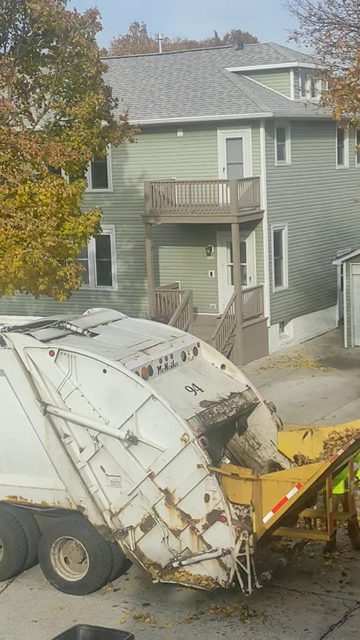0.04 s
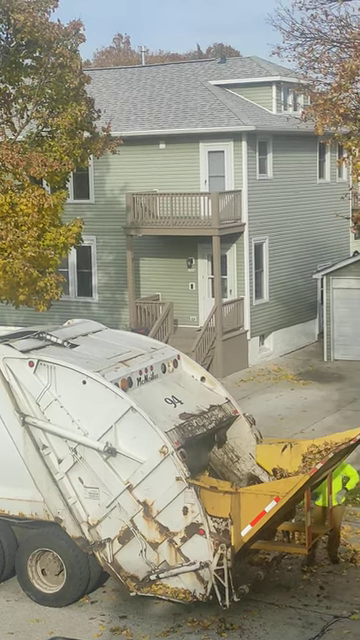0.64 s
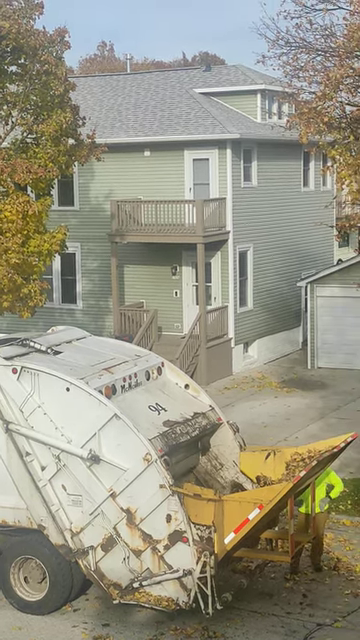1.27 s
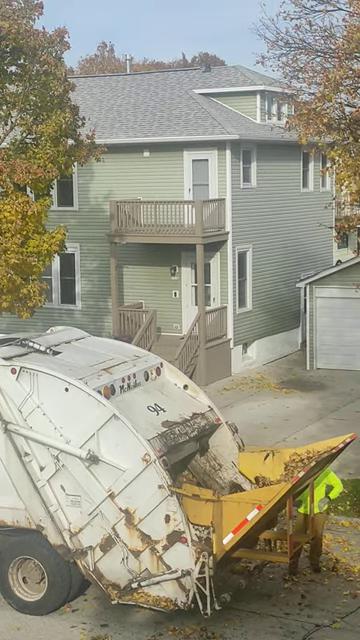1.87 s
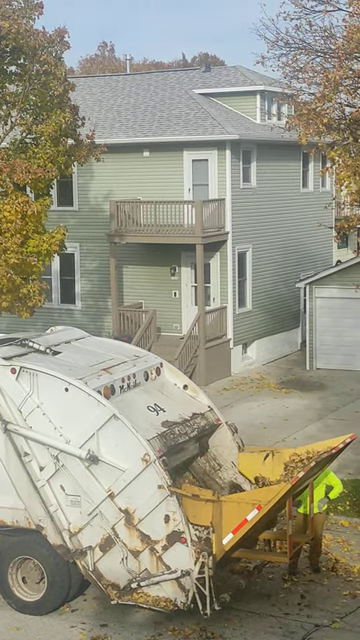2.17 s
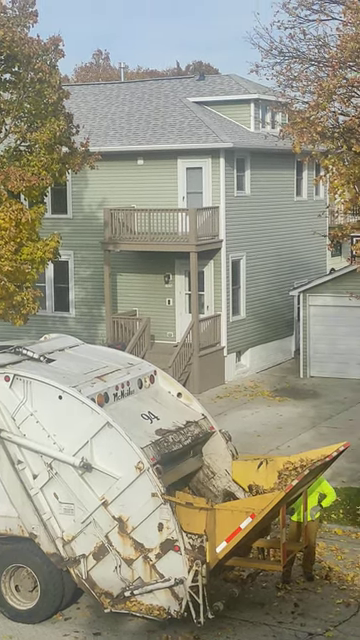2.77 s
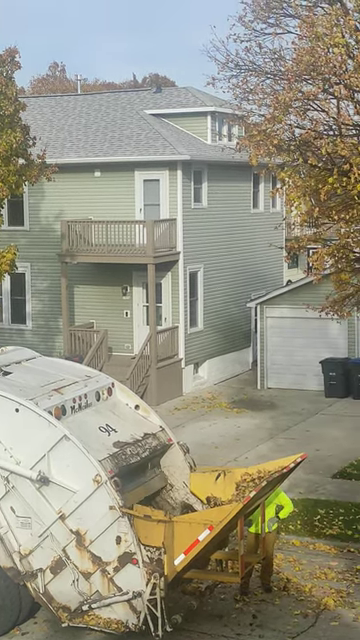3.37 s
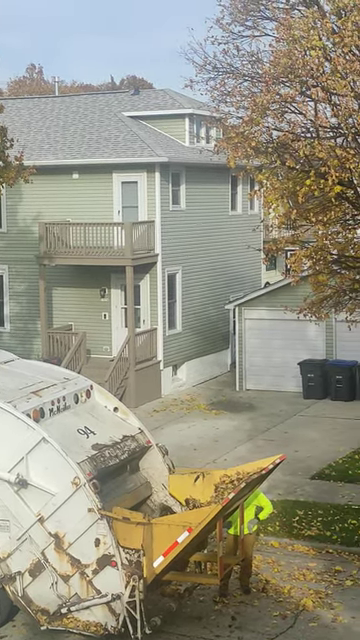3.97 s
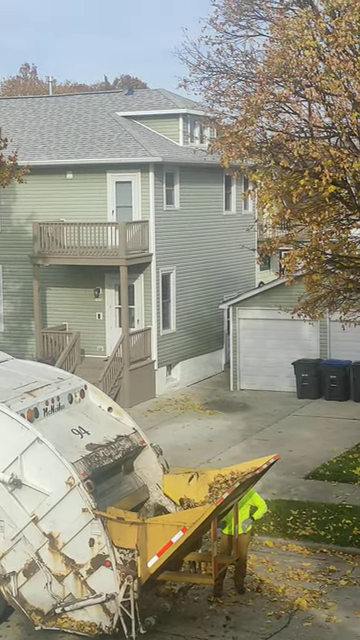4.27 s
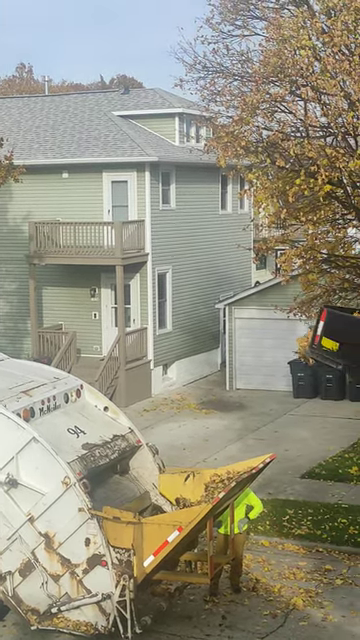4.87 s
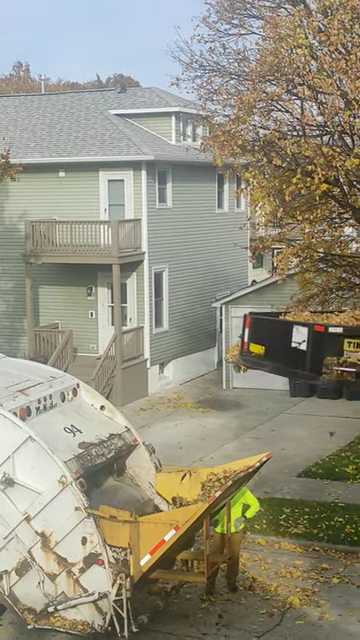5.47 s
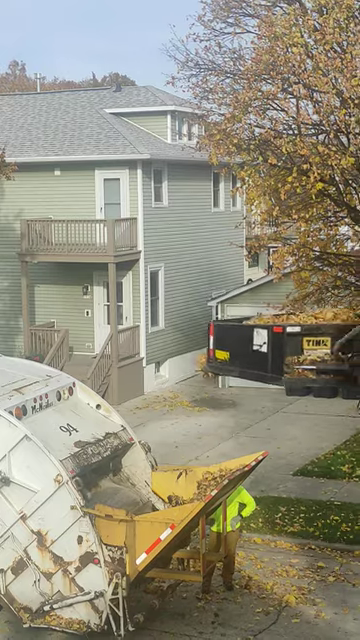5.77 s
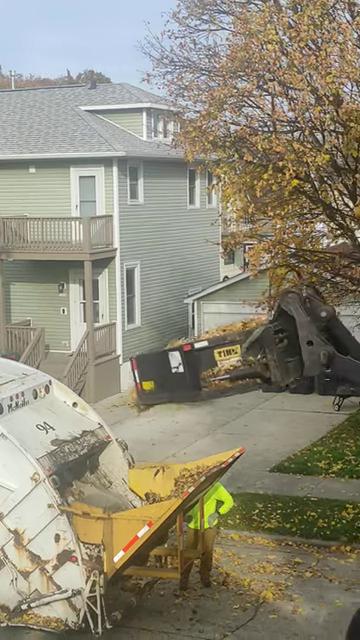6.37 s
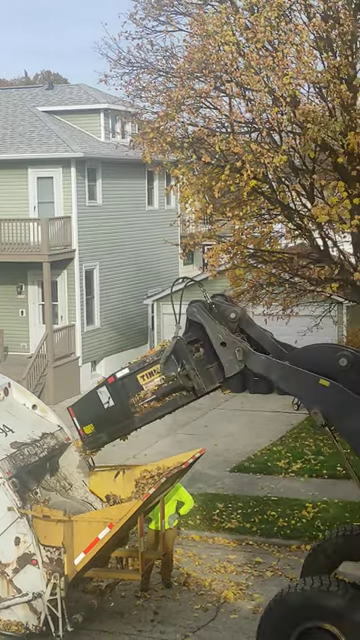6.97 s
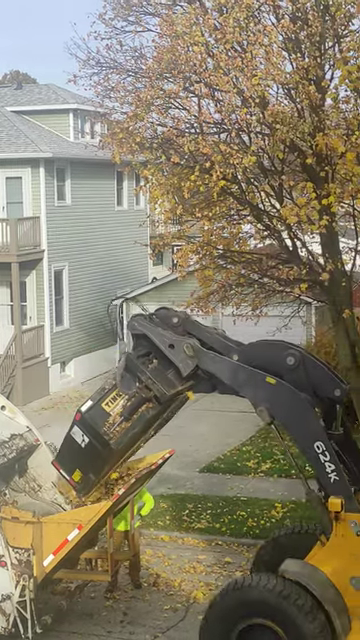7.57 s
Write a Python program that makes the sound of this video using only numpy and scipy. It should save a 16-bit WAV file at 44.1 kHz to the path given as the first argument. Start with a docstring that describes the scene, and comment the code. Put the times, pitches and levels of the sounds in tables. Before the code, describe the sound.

A muffled diesel drone and an even, low hydraulic hum from a refuse truck run from the start, heard inside a parked cab that booms softly. A few small, close creaks sound in the first second or so. At about 2 seconds a dull bump shakes the cab. From 3 seconds a loader's engine sinks in pitch, while the truck's hum builds, holding strongest from about 4.5 to 7 seconds. Faint cloth rustle and a quick run of short creaks come between 3.4 and 4.5 seconds. Around 6 seconds the loader slows again, and light plastic trim ticks follow one another until about 6.7. At 7 seconds the heaviest dull bump lands, with a brief groan that bends upward and settles, plus a rustle and creaks. The hum drops away, and a smaller bump at 7.4 seconds sounds over the continuing engine drone.

```python
"""A muffled engine drone and a steady hydraulic hum, heard inside a parked cab that booms at a few pitches.
The hum is the gear pump of a refuse truck at fast idle; the sinking drone is a wheel loader that drives
up and slows to tip leaves into it. Dull bumps shake the cab's resonances, and the heaviest draws a groan.
Close by, cloth rustles, small stick-slip creaks set a panel ringing and plastic trim ticks."""
import sys
import numpy as np
from scipy import signal
from scipy.fft import rfft, irfft
from scipy.io import wavfile
from scipy.ndimage import uniform_filter1d

SR = 44100
rng = np.random.default_rng(int(sys.argv[2]) if len(sys.argv) > 2 else 0)


def unload_audio(sound):
    """Save the sound as a 16-bit wav file, at the path given as the first command line argument."""
    columns = np.transpose(np.atleast_2d(sound))
    # keep every value between -1 and 1, then stretch to whole-number steps
    steps = np.round(np.clip(columns, -1, 1) * 32767)
    wavfile.write(sys.argv[1], SR, steps.astype(np.int16))


N = 336483

# Levels are fader settings: each layer adds its own trim and pan.
# stereo image of the cab's air: (frequency [Hz], left-right likeness [ratio])
AIR_LIKENESS = [(50, 0), (300, 1.5), (500, -0.18), (1000, 0), (8000, 0)]
# its lean: (frequency [Hz], left over right [dB])
AIR_BALANCE = [(50, 7.5), (300, 6.5), (550, 0.5), (1000, 2), (2000, 2.5), (4500, -2), (8000, -1.5)]
# cab air resonances: (frequency [Hz], width [Hz], gain under the engines [dB], gain when bumped [dB])
CAB_MODES = [(86, 50, -33.5, -2.5), (145, 23, -31.5, -21), (173.3, 9, -9.5, -1.5), (198.6, 17.2, -1.5, 12),
             (222, 35, -8.5, -1), (289.1, 12.2, 0, 7.5), (379.2, 8.1, -13.5, -10.5), (640, 130, -37, -13.5)]
# ride on the cab boom: (time [s], level [dB])
BOOM_RIDE = [(0, -54), (3.3, -60), (6, -57.5), (6.85, -50), (7.28, -58.5), (7.6, -49)]
# ride on the engine noise: (time [s], clatter level [dB], hiss level [dB])
DIN_RIDE = [(0.0, -67.5, -76.5), (1.95, -69, -79.5), (6.82, -68, -78.5), (7.06, -59, -70),
            (7.27, -67, -78.5), (7.63, -69, -79.5)]
# low, middle and high engine noise, each: (frequency [Hz], relative gain [dB])
RUMBLE_EQ = [(22, -25.5), (38, 7.5), (50, 15), (75, 22.5), (100, 9.5), (130, 5), (165, -2.5), (250, 5),
             (340, 15.5), (420, 14), (480, 6), (700, -41.5)]
CLATTER_EQ = [(260, -32), (440, -0.5), (474, -13.5), (513, -4.5), (857, -9.5), (1120, -14), (1370, -14.5),
              (1840, -19), (2140, -21), (2850, -21), (3150, -27.5), (3600, -36.5), (4680, -86.5),
              (7920, -120)]
HISS_EQ = [(2000, -5.5), (3000, -6.5), (3600, 3.5), (4300, 4), (5800, 0), (6900, 0.5), (7600, 1.5),
           (9100, -3), (9800, -28.5), (12500, -29.5)]

# bouts of cloth rustle: (time [s], level [dB], rise [s], decay [s])
RUSTLES = [(0.137, -72, 0.0068, 0.014), (0.62, -87.5, 0.33, 0.42), (2.0, -66.5, 0.019, 0.014),
           (3.75, -79, 0.16, 0.37), (5.62, -87.5, 0.11, 0.2), (7.065, -69.5, 0.079, 0.04),
           (7.245, -73, 0.023, 0.045)]
# a creak's crisp top and hollow body, each: (frequency [Hz], relative gain [dB])
CRISP_EQ = [(2000, -29.5), (3200, -6.5), (5000, -2.5), (6200, -3), (7400, 8), (8700, 2), (9800, -14),
            (12000, -31), (15000, -43.5)]
HOLLOW_EQ = [(400, -15.5), (780, 5.5), (1030, 12), (1350, 2), (1900, 3.5), (2400, 0), (2900, -5),
             (3600, -2.5), (4400, -24.5)]
# creaks and short scrapes: (time [s], level [dB], body offset [dB], left over right [dB], hold [s])
CREAKS = [(.128, -69.5, -5.5, -8, 0.0097), (0.331, -59.5, -4, -1, 0.0041), (0.624, -72.5, 19.5, 5, 0.0045),
          (0.74, -61, 6, -13, 0.0029), (0.9158, -56, -1.5, 3, 0.0028), (1.12, -53, -15, -3, 0.015),
          (1.135, -54.5, 2, -5.5, 0.019), (2.528, -60.5, 2.5, 5, .002), (3.3705, -65, 6.5, 3, 0.0035),
          (3.393, -61, 9.5, 1, 0.012), (3.624, -52.5, 3, 3, 0.011), (3.7245, -62.5, 8.5, -1, 0.0027),
          (3.766, -67.5, 10.5, 2, .009), (3.807, -61.5, 0.5, 9, .003), (3.854, -58.5, 7, 1, .002),
          (3.8885, -64, -10, 1, .001), (3.919, -58, 4, -1, 0.0027), (3.971, -61, 7.5, -4, .004),
          (4.045, -59, 8, 0, .002), (4.0868, -47.5, 1.5, 3, 0.003), (4.158, -56, 4, 1, 0.0076),
          (4.1975, -56.5, 5, -3, .001), (4.2315, -54, -7.5, -3, 0.0023), (4.25, -55.5, 6, -1, .002),
          (4.3035, -59.5, 1, 0, 0.0011), (4.4435, -61.5, 9.5, -2.5, 0.0026), (4.526, -57, 5.5, 0, 0.0022),
          (5.62, -68, 6, 0, 0.015), (5.712, -62.5, 7.5, 5, 0.002), (6.8485, -58.5, 0, -1, .002),
          (6.938, -57.5, -0.5, -2, 0.0031), (7.216, -60, -19, -4, 0.034), (7.2635, -47.5, -25.5, 0, 0.0047)]
# the panel they set ringing: (frequency [Hz], width [Hz], level over the creaks' body [dB])
PANEL_MODES = [(1090, 60, -16.5), (1660, 73, -15.5), (2260, 390, -29.5), (2880, 180, -15)]
# faint rings left by a few creaks: (time [s], half length [s], pitch [Hz], level [dB])
SQUEAKS = [(1.136, 0.0091, 1800, -67), (1.164, 0.13, 7530, -86), (2, 0.014, 6600, -77),
           (3.634, 0.021, 1040, -67), (6.938, 0.007, 1890, -63)]
# plastic trim ticks: (time [s], crack [dB], lower ring [dB], upper ring [dB], left over right [dB])
TICKS = [(.277, -71.5, -75, -79, -2), (1.518, -62.5, -68, -69, -2), (3.188, -78, -75, -71.5, -7),
         (5.258, -62, -69, -70, 0), (5.911, -62.5, -78, -72, 1), (6.079, -80, -84, -71.5, -1),
         (6.14, -74, -82, -84, -5), (6.2258, -66, -77, -71, -1), (6.280, -68.5, -69, -76, -8),
         (6.343, -74, -74, -66, -6), (6.459, -67, -80, -84, 3), (6.5, -66, -78, -67.5, -5),
         (6.547, -71, -78, -72, -4), (6.692, -75, -79, -73, 1), (7.116, -65, -69, -62, -12)]
# the trim's two rings: (frequency [Hz], width [Hz])
TRIM_MODES = [(5250, 980), (7400, 490)]
# dull bumps: (time [s], level [dB], rise [s], decay [s])
BUMPS = [(2.02, -42, 0.069, 0.044), (2.098, -45.5, 0.029, 0.11), (7.045, -37.5, 0.012, 0.069),
         (7.12, -44.5, 0.013, 0.088), (7.41, -44.5, 0.029, 0.028)]
# the cab's groan under the heaviest bump: (time [s], pitch [Hz], level [dB])
GROAN = [(6.96, 268, -89), (7.025, 260.6, -42.5), (7.058, 287, -34), (7.08, 300, -36), (7.11, 298, -55),
         (7.148, 293.4, -40), (7.218, 281.7, -41), (7.27, 288, -96)]

# loader engine, slowing in two steps: (time [s], firing rate [Hz])
FIRING_RATE = [(0, 66.5), (.3, 69.8), (1.3, 73.7), (2.9, 73.4), (3.8, 64.6), (4.5, 63.4), (5.8, 63),
               (6.65, 53.2), (7.2, 51.3), (7.63, 52.5)]
# ride on its exhaust's firing tone: (time [s], level [dB])
EXHAUST_RIDE = [(0, -49), (.13, -40), (.5, -40), (1.45, -50), (3.12, -52.5), (3.35, -45), (3.8, -54),
                (6, -53), (6.8, -48), (7.6, -44)]
# brief dips in that tone as the loader moves: (time [s], half length [s], depth [dB])
EXHAUST_DIPS = [(3.592, 0.074, 14), (5.014, 0.21, 17), (6.103, 0.068, 31)]
# overtones of the firing tone: (pitch [multiple of the firing rate])
LOADER_OVERTONES = [3, 4, 6, 8, 9, 12, 14]
# ride on those overtones: (time [s], gain [dB])
LOADER_EFFORT = [(0, -3.5), (2.9, -0.5), (3.9, -3), (4.3, 1.5), (4.7, -2), (5.15, 6.5), (5.5, 0),
                 (5.9, 3.5), (6.2, -1)]
# their pan at 300, 380 and 570 Hz: (left over right [dB])
OVERTONE_PAN = [5.5, 13.5, 8.5]
# resonances that lift an overtone gliding through: (frequency [Hz], half width [Hz], gain [dB])
DRONE_PEAKS = [(189.3, 2.2, 12), (291, 17, 25), (360, 13.4, 17), (381.8, 15.3, 23.5), (449, 13, 17.5),
               (563, 8, 10), (634, 27, 7), (747, 17, 11.5), (884, 4.3, 10.5)]
# tones from uneven cylinders: (pitch [multiple of the six-firing cycle rate])
UNEVEN_ORDERS = [3, 4, 12, 14, 16]
# their mix: (level at speed [dB], level when slowed [dB])
UNEVEN_LEVELS = [(-66, -79.5), (-71, -67), (-73, -76), (-68.5, -87), (-85.5, -78.5)]
# loader hydraulics: (time [s], pitch [Hz], level [dB])
LOADER_PUMP = [(0, 258.6, -64), (2.2, 262, -61.5), (2.95, 258.3, -64), (3.35, 234, -56),
               (4.4, 229.2, -57.5), (5.5, 221.9, -72.5), (7.63, 197, -65)]

# truck crankshaft: (time [s], speed [turns/s])
CRANK_SPEED = [(0, 21.7), (.3, 21.57), (.9, 21.27), (1.5, 21.12), (2.6, 21.0), (3.5, 20.91), (4.5, 20.85),
               (7.63, 20.84)]
# truck engine tones: (pitch [multiple of crankshaft speed])
TRUCK_ORDERS = [3, 6, 8, 9, 12, 14, 15, 18, 25, 28, 30, 33, 50]
# their mix: (level [dB])
TRUCK_LEVELS = [-72.5, -76.5, -71, -71.5, -79, -70, -74, -78.5, -86.5, -85.5, -85, -85.5, -84.5]
# timing gear mesh, from the first harmonic up: (gain [dB])
GEAR_HARMONICS = [5.5, -1, 0, -6]
# ride on the pump hum, building under load and dropping near the end: (time [s], level [dB])
PUMP_RIDE = [(0, -51.5), (.28, -44), (.7, -51.5), (1.3, -50.5), (2.05, -46.5), (3.7, -44), (4.4, -40.5),
             (7.03, -40.5), (7.2, -63)]
# the hum's edge: (time [s], second harmonic level [dB], fourth harmonic level [dB])
PUMP_OVERTONES = [(0, -64, -84.5), (.6, -62, -80), (1.2, -69, -80.5), (3.1, -69, -81), (4.1, -68, -91),
                  (6, -70.5, -94.5), (7, -70, -93)]


def from_db(db):
    """Decibels to gain."""
    return 10 ** (np.asarray(db) / 20)


def unit_power(x):
    """Scale to unit power."""
    return x / np.sqrt(np.mean(x ** 2) + 1e-20)


def in_time(rows):
    """Each column of an automation curve at every sample."""
    times, *columns = np.transpose(rows)
    return [np.interp(np.arange(N) / SR, times, column) for column in columns]


def at_hz(points, hz):
    """Read a curve on a log-frequency axis."""
    freqs, values = np.transpose(points)
    return np.interp(np.log(hz + 1), np.log(freqs), values)


def panned(db):
    """Left and right gains, averaging one, with the left louder by db."""
    gains = from_db(np.array([[.5], [-.5]]) * db)
    return gains / gains.mean(axis=0)


def drift(rate_hz):
    """A smooth random wobble with a spread of one."""
    step = 40  # samples per control point
    pole = np.exp(-2 * np.pi * step * rate_hz / SR)
    slow = signal.lfilter([1], [1, -2 * pole, pole * pole], rng.standard_normal(N // step + 2002))[2000:]
    return np.interp(np.arange(N) / step, np.arange(len(slow)), unit_power(slow))


def bell(s, half_length):
    """A smooth rise to one and back."""
    return np.exp(-((np.arange(N) / SR - s) / half_length) ** 2)


def swells(rows):
    """Summed gain of events that each rise and decay exponentially."""
    t = np.arange(N) / SR
    return sum(from_db(db) * np.exp(-np.maximum((s - t) / rise, (t - s) / decay))
               for s, db, rise, decay in rows)


def white():
    """Stereo white noise."""
    return rng.standard_normal((2, N))


def coloured(x, eq):
    """Apply an EQ curve, keeping the power of white input."""
    gains = unit_power(from_db(at_hz(eq, np.fft.rfftfreq(N, 1 / SR))))
    return irfft(rfft(x) * gains, N)


def resonate(x, hz, width):
    """One resonance, applied twice for steep skirts; unit power."""
    b, a = signal.iirpeak(hz, hz / (1.4 * width), fs=SR)
    return unit_power(signal.lfilter(b, a, signal.lfilter(b, a, x)))


def partial(turns, order, rough, pan_db=3.5):
    """One tone wavering in level and phase; high tones reach left and right out of step."""
    mean_hz = order * turns[-1] * SR / N
    lag = min(mean_hz / 900, 1.2) * np.array([[.5], [-.5]])
    waver = 1 + rough * (drift(0.97) + 1j * drift(3.8))
    return np.sqrt(2) * np.real(waver * np.exp(1j * (2 * np.pi * order * turns + lag))) * panned(pan_db)


def cab_air():
    """Noise as the cab spreads it: left and right alike in the low mids, diffuse in the treble."""
    hz = np.fft.rfftfreq(N, 1 / SR)
    mid, side = rfft(white())
    alike = np.clip(at_hz(AIR_LIKENESS, hz), -.9, 1)
    spread = np.sqrt((1 - alike) / (1 + alike)) * side * [[1], [-1]]
    return irfft((mid + spread) * panned(at_hz(AIR_BALANCE, hz)), N)


def engine_din(crank, firings):
    """The bed: combustion noise throbs with both engines, over cab boom, rumble and a faint hiss."""
    clatter_db, hiss_db = in_time(DIN_RIDE)
    throb = 1 + 0.037 * np.cos(2 * np.pi * firings) + 0.043 * np.cos(4 * np.pi * crank)
    air = cab_air()
    modes = sum(from_db(db) * resonate(air, hz, width) for hz, width, db, _ in CAB_MODES)
    boom = from_db(in_time(BOOM_RIDE)[0]) * modes
    rumble = from_db(-63.5) * coloured(cab_air(), RUMBLE_EQ)
    clatter = from_db(clatter_db - 3.0 + 1.6 * drift(30)) * throb * coloured(cab_air(), CLATTER_EQ)
    hiss = from_db(hiss_db - 6.0) * coloured(cab_air(), HISS_EQ)
    return boom + rumble + clatter + hiss


def grains(coarse_db):
    """Stick-slip texture: noise broken into millisecond grains, smooth when coarse_db is zero."""
    return unit_power(white() * from_db(coarse_db * np.clip(drift(370), -2, 2)))


def slip_burst(age, held, swell, decay):
    """Slips build within milliseconds, hold, then die away into a faint tail."""
    after = np.maximum(age - held, 0)
    return np.exp(np.minimum(age, 0) / swell) * (np.exp(-after / decay) + 0.1 * np.exp(-after / 0.011))


def around(s):
    """The samples from 20 ms before a cue to 100 ms after it."""
    return slice(int(s * SR) - SR // 50, int(s * SR) + SR // 10)


def cloth(rustle, crisp, hollow, floor_db=-91):
    """Cloth rubs in fluttering bouts, and its weave rasps in a narrow band."""
    flutter = (from_db(floor_db) + rustle) * from_db(3.7 * drift(28))
    rasp = from_db(-4.5) * resonate(white(), hz=6630, width=760)
    return flutter * ((crisp + rasp) * panned(-6.0) + from_db(-2.5) * hollow)


def small_creaks(rustle, full_rustle_db=-81, max_per_s=50, body_db=5.0, pan_db=1.5, held=.001):
    """Cues for faint random creaks, the likelier the stronger the rustle."""
    slots = 600
    jitter, lucks, sizes = rng.random((slots, 3)).T
    chance = np.minimum(rustle / from_db(full_rustle_db), 1) * max_per_s * N / SR / slots
    times = np.linspace(.05, N / SR - .15, slots) + .02 * jitter
    levels = -73 - 5.5 * (2 * sizes - 1)
    return [(s, db, body_db, pan_db, held)
            for s, db, luck in zip(times, levels, lucks) if luck < chance[int(s * SR)]]


def creaks(cues, crisp, hollow):
    """Each creak is a burst of slips with a crisp top and a hollow body that sets a panel ringing."""
    t, top, body = np.arange(N) / SR, np.zeros((2, N)), np.zeros((2, N))
    for s, db, body_db, pan_db, held in cues:
        span = around(s)
        age = t[span] - s - .002
        top_gain = from_db(db - 9.0) * slip_burst(age, held, swell=0.0016, decay=0.0035)
        body_gain = from_db(db + body_db - 11.5) * slip_burst(age, held, swell=0.0027, decay=0.0069)
        top[:, span] += top_gain * panned(pan_db) * crisp[:, span]
        body[:, span] += body_gain * panned(1.0) * hollow[:, span]
    panel = body.std() * sum(from_db(db) * resonate(body, hz, width) for hz, width, db in PANEL_MODES)
    return top + body + panel


def squeaks():
    """Thin rings that swell and fade; the shorter the ring, the broader and rougher it is."""
    t = np.arange(N) / SR
    return sum(from_db(db) * np.exp(-((t - s) / half) ** 4) * resonate(white(), hz, width=2 / half)
               for s, half, hz, db in SQUEAKS)


def trim_ticks():
    """Plastic trim lets go with a short crack and rings at two pitches, in a different mix each time."""
    t, out = np.arange(N) / SR, np.zeros((2, N))
    crack = coloured(grains(coarse_db=7.5), CRISP_EQ) + from_db(-2.0) * coloured(white(), HOLLOW_EQ)
    rings = [resonate(white(), hz, width) for hz, width in TRIM_MODES]
    for s, *levels, pan_db in TICKS:
        span = around(s)
        blend = sum(from_db(db) * part[:, span] for db, part in zip(levels, [crack] + rings))
        snap = slip_burst(t[span] - s, held=.0015, swell=0.00064, decay=0.0039)
        out[:, span] += snap * panned(pan_db) * blend
    return out


def bumps():
    """Heavy, drawn-out contacts shake the cab resonances."""
    air = cab_air()
    shudder = sum(from_db(db) * resonate(air, hz, width) for hz, width, _, db in CAB_MODES)
    # level the shudder so that the force alone sets the loudness
    loudness = np.sqrt(uniform_filter1d(shudder.mean(axis=0) ** 2, size=1500) + 1e-9)
    return swells(BUMPS) * shudder / loudness


def cab_groan():
    """A rough tone that bends upward as the cab is strained, then settles near one of its resonances."""
    hz, db = in_time(GROAN)
    return from_db(db + drift(40)) * partial(np.cumsum(hz) / SR, order=1, rough=.05, pan_db=6.5)


def overtone_db(hz, db_at_200_hz=-73, fall_db_per_octave=11):
    """A loader overtone's level in the cab: muffled as its pitch rises, lifted at each resonance."""
    lift_db = sum(db * np.exp(-((hz - centre) / width) ** 2) for centre, width, db in DRONE_PEAKS)
    return db_at_200_hz - fall_db_per_octave * np.log2(hz / 200) + lift_db


def loader_engine(firings, firing_hz):
    """Six cylinders: an exhaust tone, overtones gliding through resonances, tones of uneven firing."""
    dip_db = sum(db * bell(s, half_length) for s, half_length, db in EXHAUST_DIPS)
    exhaust_db = in_time(EXHAUST_RIDE)[0] - dip_db
    out = from_db(exhaust_db) * partial(firings, order=1, rough=0.011, pan_db=4.5)
    effort_db = in_time(LOADER_EFFORT)[0]
    for order in LOADER_OVERTONES:
        hz = order * firing_hz
        pan_db = np.interp(hz, [300, 380, 570], OVERTONE_PAN)
        out += from_db(effort_db + overtone_db(hz)) * partial(firings, order, rough=0.092, pan_db=pan_db)
    slowed = np.interp(firing_hz, [63, 70], [1, 0])
    for order, (fast_db, slow_db) in zip(UNEVEN_ORDERS, UNEVEN_LEVELS):
        out += from_db(fast_db + (slow_db - fast_db) * slowed) * partial(firings, order / 6, rough=0.25)
    return out


def loader_hydraulics():
    """The loader's pump hum sinks as the machine slows."""
    hz, db = in_time(LOADER_PUMP)
    return from_db(db) * partial(np.cumsum(hz) / SR, order=1, rough=0.11)


def truck_engine(crank, fade_db=3.1):
    """Weak tones locked to the crankshaft, each slowly fading in and out."""
    return sum(from_db(db + fade_db * drift(0.41)) * partial(crank, order, rough=0.3)
               for order, db in zip(TRUCK_ORDERS, TRUCK_LEVELS))


def gear_whine(crank, teeth=34):
    """The truck's timing gears mesh in a thin whine that swells once."""
    mesh = sum(from_db(db) * partial(crank, order=teeth * k, rough=0.5, pan_db=-4.0)
               for k, db in enumerate(GEAR_HARMONICS, 1))
    return from_db(-92 + 4.5 * bell(5.1, half_length=1)) * mesh


def pump_hum(crank, teeth=10):
    """The lead: the truck's gear pump pulses once per tooth, a hum that grows purer under load."""
    hum = from_db(in_time(PUMP_RIDE)[0] - 2.5) * partial(crank, order=teeth, rough=0.019, pan_db=5.0)
    for harmonic, db in zip((2, 4), in_time(PUMP_OVERTONES)):
        hum += from_db(db) * partial(crank, order=harmonic * teeth, rough=0.28, pan_db=9.0)
    return hum


def scene():
    """The mix: both machines, the cab sounding around them, and the small noises up close."""
    crank = np.cumsum(in_time(CRANK_SPEED)[0]) / SR  # turns so far
    firing_hz = in_time(FIRING_RATE)[0]
    firings = np.cumsum(firing_hz) / SR
    truck = pump_hum(crank) + truck_engine(crank) + gear_whine(crank)
    loader = loader_engine(firings, firing_hz) + loader_hydraulics()
    cab = engine_din(crank, firings) + bumps() + cab_groan()
    # creaks and cloth share two friction textures
    crisp = coloured(grains(coarse_db=3.5), CRISP_EQ)
    hollow = coloured(grains(coarse_db=0.0), HOLLOW_EQ)
    rustle = swells(RUSTLES)
    friction = cloth(rustle, crisp, hollow) + creaks(list(CREAKS) + small_creaks(rustle), crisp, hollow)
    return truck + loader + cab + friction + trim_ticks() + squeaks()


def record(dry, cutoff_hz=12700):
    """A steep low-pass takes off the very top."""
    return signal.sosfilt(signal.ellip(10, .1, 80, cutoff_hz, fs=SR, output="sos"), dry)


dry = scene()
out = record(dry)
unload_audio(out)
```